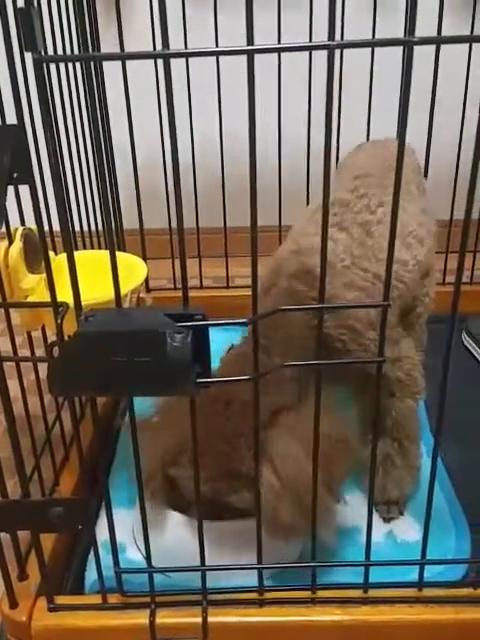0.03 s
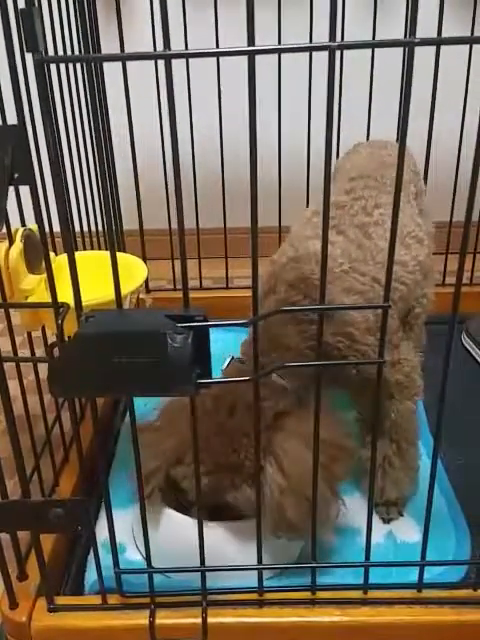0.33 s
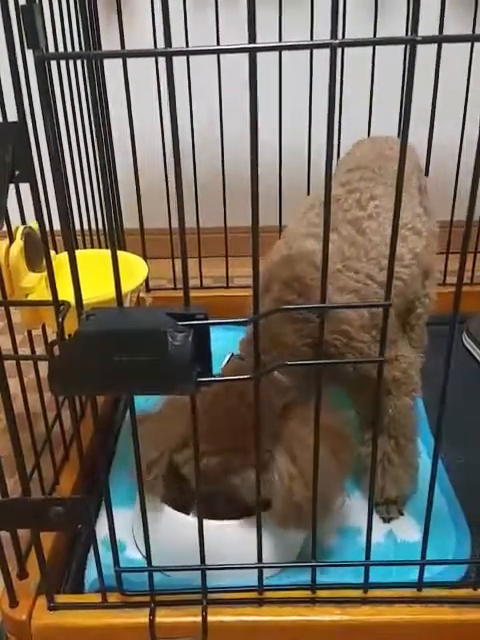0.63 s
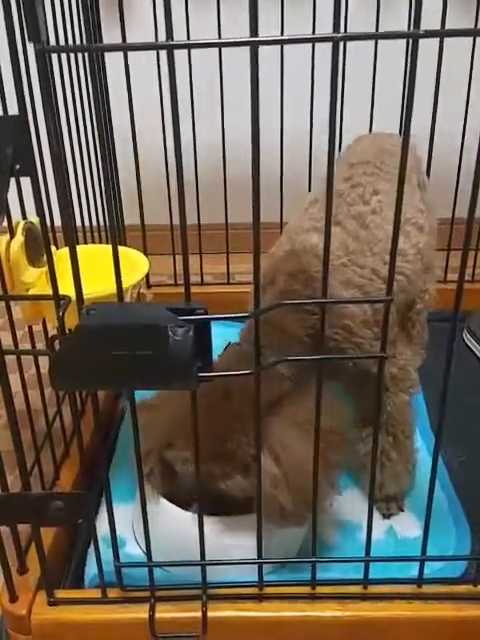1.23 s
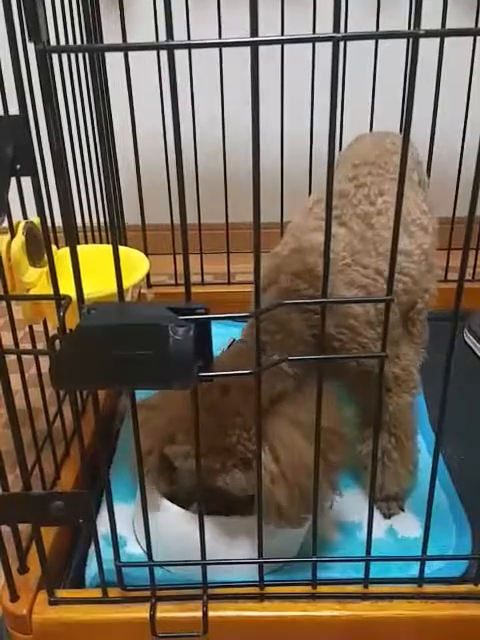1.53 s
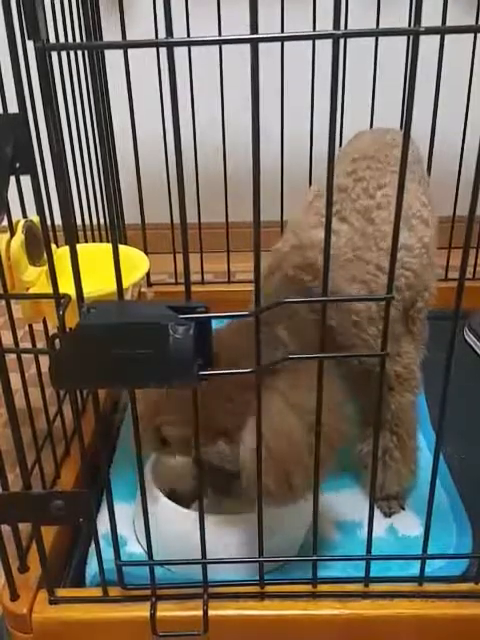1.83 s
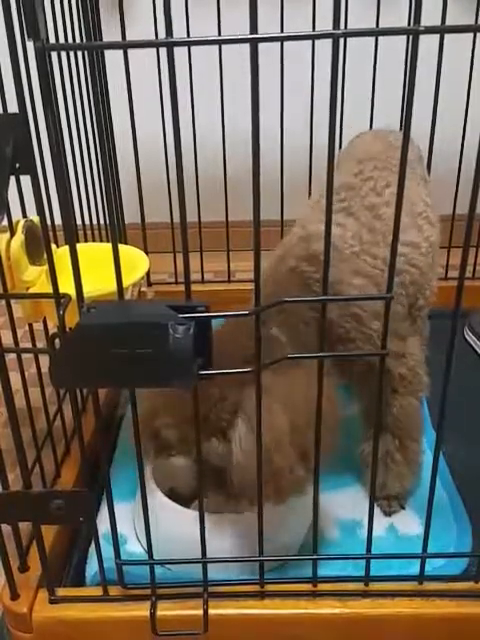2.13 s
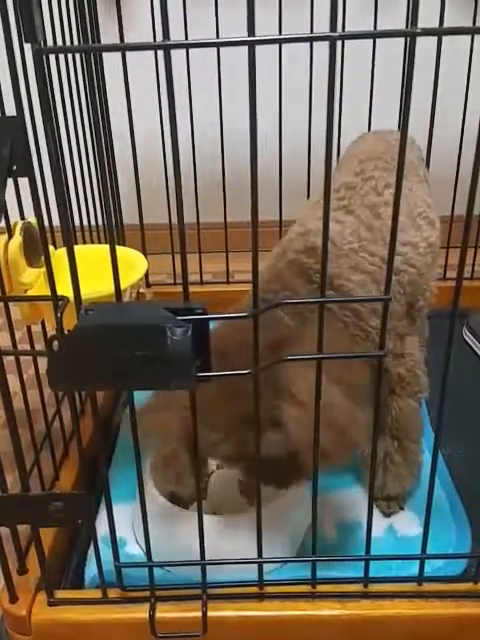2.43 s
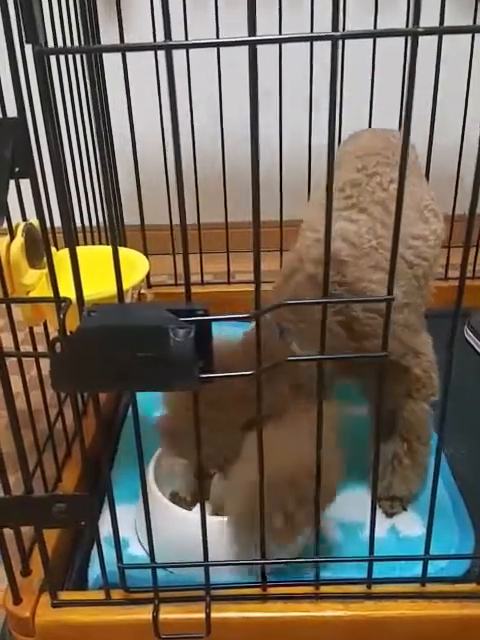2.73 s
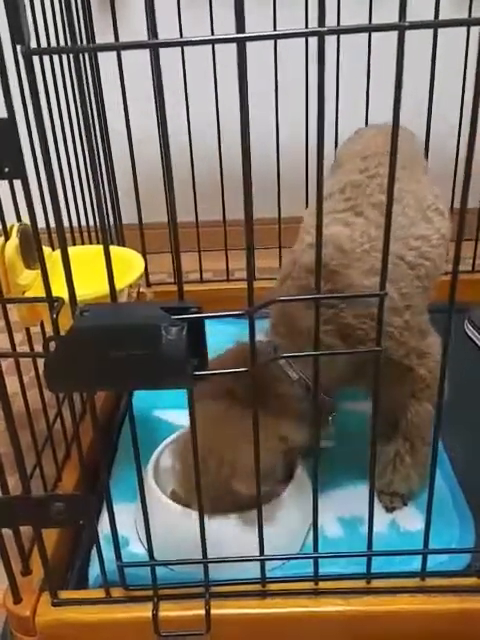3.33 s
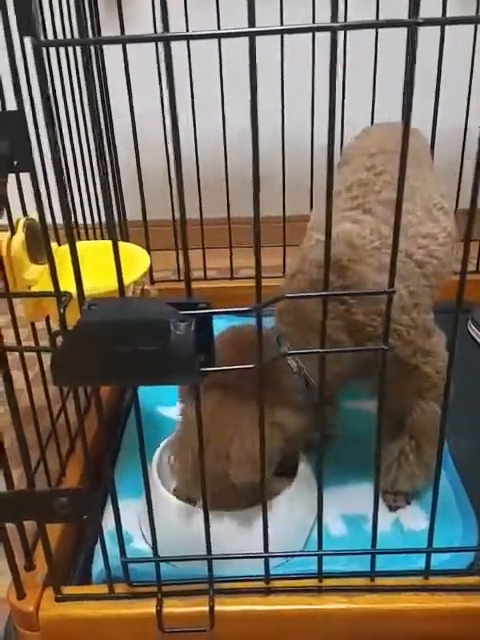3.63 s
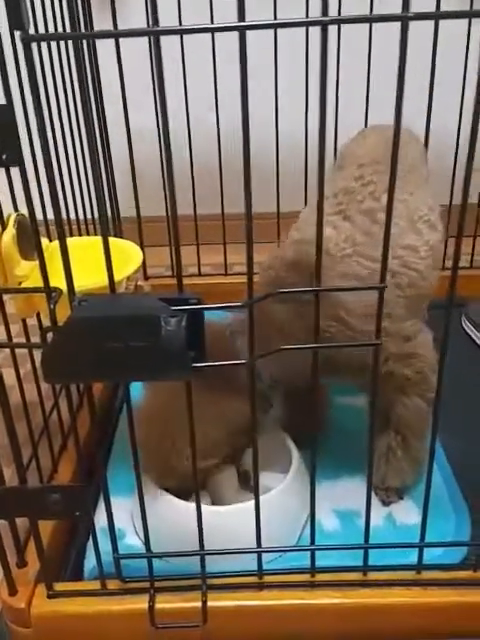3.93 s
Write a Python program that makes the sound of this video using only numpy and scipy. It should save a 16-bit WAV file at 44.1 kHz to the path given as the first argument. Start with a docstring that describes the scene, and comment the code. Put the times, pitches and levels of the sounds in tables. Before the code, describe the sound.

A small dog crunches dry food from a bowl, with a few dull microphone bumps.

```python
"""A quiet room, with a stereo microphone by a wire cage where a small dog chews dry food at a bowl.
Pellets crack and crumble, sounding the jaw and faintly ringing the bowl; teeth click, the tongue
ticks and the muzzle rubs through the food. Two runs of soft low knocks pass over the room's hush.
The right microphone port is muffled, so the crunching leans left, and handling bumps that port
with a few dull thuds."""
import sys
import numpy as np
from scipy import signal
from scipy.fft import rfft, irfft, next_fast_len
from scipy.io import wavfile
from scipy.ndimage import map_coordinates

SR = 44100
rng = np.random.default_rng(int(sys.argv[2]) if len(sys.argv) > 2 else 0)


def int16_out(signal):
    """Quantize to a 16-bit WAV file."""
    q = np.round(np.clip(np.atleast_2d(signal).T, -1, 1) * 32767)
    wavfile.write(sys.argv[1], SR, q.astype(np.int16))


N = 176400


def amp(db):
    return 10 ** (np.asarray(db) / 20)


def unit_rms(x):
    return x / np.sqrt(np.mean(x ** 2) + 1e-30)


def along(points, hz):
    """Read a curve of (Hz, value) points on a log frequency axis."""
    point_hz, values = np.transpose(points)
    return np.interp(np.log(hz + 1), np.log(point_hz + 1), values)


def add(track, start, sound):
    """Mix a sound in at a start time in seconds."""
    i = max(round(start * SR), 0)
    track[i:i + len(sound)] += sound[:max(N - i, 0)]


def coloured(x, points, keep_power=False):
    """Pass x through a minimum-phase filter with the given (Hz, dB) shape."""
    size = 2 * next_fast_len(N // 2 + SR // 8)
    gain = amp(along(points, np.fft.rfftfreq(size, 1 / SR)))
    cepstrum = irfft(np.log(unit_rms(gain) if keep_power else gain), size)
    cepstrum[1:size // 2] *= 2
    cepstrum[size // 2 + 1:] = 0
    return irfft(rfft(x, size) * np.exp(rfft(cepstrum)), size)[:N]


def evened(x):
    """Halve the spectral peaks and holes of x in dB, keeping its energy."""
    spectrum = rfft(x)
    even = irfft(spectrum / np.sqrt(np.abs(spectrum) + 1e-9), len(x))
    return even * np.linalg.norm(x) / np.linalg.norm(even)


def ring(t, hz, t60, rise_s=0.00087):
    """One damped mode with a quick rise."""
    return np.sin(2 * np.pi * hz * t) * amp(-60 * t / t60) * (1 - np.exp(-t / rise_s))


def burst(t, rise_s=0.00068, decay_s=0.00059):
    """A broadband crack that dies within a few milliseconds."""
    decay = np.exp(-t / decay_s)
    rise = 1 - np.exp(-t / rise_s)
    crack = evened(rise * decay * rng.standard_normal(len(t)))
    crack *= np.exp(-t / decay_s / 10)  # keeps the evened crack short
    return crack * np.linalg.norm(decay) / np.linalg.norm(crack)


# The room's reverberation. Each row: frequency in Hz, t60 in seconds.
ROOM_DECAY = [(200, 0.4), (2000, 0.37), (8000, 0.28), (15000, 0.17)]
def in_room(sound, wet_db):
    """A short sound reaches the microphone directly, then as its own diffuse room tail."""
    hz, t, noise = signal.stft(rng.standard_normal(SR // 3), SR, nperseg=256)
    decay = amp(-60 * t / along(ROOM_DECAY, hz)[:, None])
    tail = signal.istft(noise * decay, SR, nperseg=256)[1]
    tail = np.pad(tail, (SR // 500, 0))  # 2 ms behind the direct sound
    response = amp(wet_db) * tail / np.linalg.norm(tail)
    response[0] = 1
    return signal.fftconvolve(sound, response)


# Room tone at each port. Each row: frequency in Hz, relative level in dB.
LEFT_TONE = [(20, -10.5), (60, -8.5), (130, 0), (190, -5.5), (310, -2.5), (420, -10), (490, -4.5),
             (620, -13), (850, -11), (1600, -18.5), (3000, -26), (4400, -31.5), (6000, -36), (7000, -33.5),
             (7950, -20.5), (8700, -29.5), (10000, -29), (15500, -30.5)]
RIGHT_TONE = [(20, -15), (70, -5.5), (130, 1.5), (180, -6), (240, -2.5), (400, -9.5), (650, -13.5),
              (900, -15.5), (1250, -20.5), (3000, -25.5), (4400, -29.5), (6000, -34), (7800, -33.5),
              (9500, -34.5), (12500, -29.5), (15500, -32)]
# How alike the ports hear it. Each row: frequency in Hz, left-right correlation.
TONE_LIKENESS = [(60, 0.61), (150, 0.77), (380, 0.51), (950, 0), (2400, 0)]
def room_tone(left_db=-60.5, right_db=-62.5, waver_db=0.6, whine_hz=9082, whine_db=-79):
    """Steady hush, alike at both ports in the bass; the left wavers slightly and has a thin whine."""
    hz = np.fft.rfftfreq(N, 1 / SR)
    spread = np.arccos(np.clip(along(TONE_LIKENESS, hz), -1, 1)) / 2
    mid, side = rfft(rng.standard_normal((2, N))) * [np.cos(spread), np.sin(spread)]
    waver = amp(waver_db * map_coordinates(rng.standard_normal(40), [np.linspace(0, 39, N)]))
    left = amp(left_db) * unit_rms(irfft((mid + side) * amp(along(LEFT_TONE, hz)), N))
    right = amp(right_db) * unit_rms(irfft((mid - side) * amp(along(RIGHT_TONE, hz)), N))
    whine = amp(whine_db) * np.sin(2 * np.pi * whine_hz * np.arange(N) / SR)
    return np.array([left * waver + whine, right])


# Soft low knocks in the room. Each row: start in seconds, level in dB, pitch in Hz, t60 in seconds.
LOW_KNOCKS = [(0.53, -44, 400, 0.018), (0.5731, -42, 423, 0.038), (0.6201, -40, 364, 0.025),
              (0.6694, -41, 406, 0.026), (0.706, -40, 298, 0.0099), (0.7576, -37.5, 400, 0.021),
              (0.790, -43, 386, 0.023), (.822, -46, 410, .02), (0.88, -48, 237, 0.021),
              (0.95, -48.5, 365, 0.029), (1.080, -55, 364, 0.093), (1.162, -52, 248, .02),
              (1.435, -44, 330, 0.024), (1.478, -47, 282, 0.032), (1.498, -44.5, 335, 0.026),
              (1.521, -46, 270, 0.05), (1.544, -49.5, 280, 0.052)]
# The scuff on each knock. Each row: frequency in Hz, relative gain in dB.
KNOCK_SCUFF_COLOUR = [(60, -17), (120, -5), (250, 1.5), (500, 2), (700, -11), (1100, -28), (3000, -66)]
def knocks(scuff_db=-14, scuff_s=0.0071):
    """Each knock is a short mode and a weaker overtone over a lower thud, blurred by a dull scuff."""
    tones, scuffs = np.zeros((2, N))
    t = np.arange(SR // 8) / SR
    for start, db, hz, t60 in LOW_KNOCKS:
        thud = amp(-7) * ring(t, hz=180, t60=0.027)
        overtone = amp(-11) * ring(t, 1.27 * hz, t60=0.018)
        add(tones, start, amp(db) * in_room(ring(t, hz, t60) + thud + overtone, wet_db=-7))
        add(scuffs, start, amp(db + scuff_db) * np.exp(-t / scuff_s) * rng.standard_normal(len(t)))
    return tones + coloured(scuffs, KNOCK_SCUFF_COLOUR, keep_power=True)


# Handling, right on the microphone. Each row: centre in seconds, level in dB, pitch in Hz,
# treble fall in dB per octave, scuff and casing level in dB relative to the push.
PORT_BUMPS = [(1.005, -44, 110, 27, -33), (1.633, -55, 60, 30, -25), (1.8146, -38.5, 92, 35, -18),
              (2.471, -26, 95, 19, -40), (3.0942, -16, 151, 27, -20.5), (3.1003, -14.5, 104.5, 21.5, -12.5),
              (3.116, -34.5, 81, 19, -15), (3.5058, -12.5, 138, 13.5, -29), (3.523, -22.5, 105, 20.5, -22)]
# A push on the port, and its scuff. Each row: frequency in Hz, relative gain in dB.
PUSH_COLOUR = [(30, 1), (60, 0), (100, 0.5), (175, 1.5), (255, 2), (350, -1), (480, -3.5), (850, -4.5),
               (1500, -5.5)]
BUMP_SCUFF_COLOUR = [(30, 9.5), (120, 3), (230, -3), (380, 3.5), (560, -7.5), (850, -11.5), (1100, -16.5),
                     (1400, -26.5), (2000, -38), (4000, -67)]
def handling_bumps(bass_db_per_octave=9, top_hz=1400, scuff_s=0.0057):
    """Each push on the port swells and dies, with a brief dull scuff and a dead knock of the casing."""
    pushes, scuffs, casing = np.zeros((3, N))
    size = 8192
    hz = np.fft.rfftfreq(size, 1 / SR)
    t = (np.arange(size) - size / 2) / SR
    for centre, db, pitch_hz, fall_db, scuff_db in PORT_BUMPS:
        octaves = np.log2((hz + 1) / pitch_hz)
        band = 1 / np.hypot(amp(-bass_db_per_octave * octaves), amp(fall_db * octaves))
        push = np.fft.fftshift(irfft(band * np.exp(-(hz / top_hz) ** 2 / 2)))
        scuff = evened(np.exp(-(t / scuff_s) ** 2) * rng.standard_normal(size))
        add(pushes, centre + t[0], amp(db) * push / push.max())
        add(scuffs, centre + t[0], amp(db + scuff_db) * scuff)
        add(casing, centre, amp(db + scuff_db) * ring(t - t[0], hz=399, t60=0.016))
    return coloured(pushes, PUSH_COLOUR) + coloured(scuffs, BUMP_SCUFF_COLOUR, keep_power=True) + casing


# The muzzle down in the bowl. Each row: centre in seconds, level in dB, half-width in seconds.
MUZZLE_RUBS = [(1.515, -60, 0.045), (1.825, -65.5, 0.031), (2.272, -61, 0.03), (2.517, -72, .04),
               (2.658, -61, 0.022), (3.083, -65.5, 0.2), (3.345, -76, 0.038)]
# The rustle of the food. Each row: frequency in Hz, relative gain in dB.
RUB_COLOUR = [(150, -0.5), (300, -1.5), (850, 4.5), (1400, 0), (2200, -8), (3300, -16), (4300, -12.5),
              (5800, -23), (7900, -10), (10000, -21), (15000, -31)]
def muzzle_rubs():
    """The muzzle rubs through the food: grainy noise that swells and fades with the pressure."""
    t = np.arange(N) / SR
    pressure = sum(amp(db) * np.exp(-2 * ((t - centre) / width) ** 2) for centre, db, width in MUZZLE_RUBS)
    return coloured(pressure * unit_rms(rng.laplace(size=N)), RUB_COLOUR, keep_power=True)


# The tongue, among the bites. Each row: start in seconds, level in dB.
TONGUE_TICKS = [(.822, -54), (1.029, -56), (3.389, -55), (3.68, -56), (3.862, -59), (3.938, -56),
                (3.942, -54.5)]
# Its thin treble. Each row: frequency in Hz, relative gain in dB.
TICK_COLOUR = [(5000, -37), (9000, -1), (12500, -4), (16000, -10)]
def tongue_ticks():
    """The wet tongue makes tiny bright bursts."""
    ticks, t = np.zeros(N), np.arange(SR // 12) / SR
    for start, db in TONGUE_TICKS:
        add(ticks, start, amp(db) * in_room(burst(t), wet_db=-9.5))
    return coloured(ticks, TICK_COLOUR, keep_power=True)


# Teeth meeting. Each row: start in seconds, level in dB, mouth pitch in Hz, relative tap level in dB.
TOOTH_CLICKS = [(0.0285, -44.5, 2000, -1), (0.378, -45, 1680, 11), (.72, -56, 2040, -6),
                (1.094, -56, 2050, -16), (1.162, -43, 1620, 6), (1.4937, -50.5, 2050, -4.5),
                (1.7986, -46, 1920, -3.5), (1.962, -53.5, 1890, -6), (1.969, -52, 1900, -3),
                (2.132, -50.5, 1930, -4), (2.199, -58, 1880, -8), (2.299, -53.5, 1770, 0),
                (2.647, -56, 1190, 10), (3.329, -52.5, 1730, -5)]
def tooth_clicks(roughness=0.041):
    """Teeth meet with a dull tap and ring the mouth briefly."""
    clicks, t = np.zeros(N), np.arange(SR // 16) / SR
    for start, db, hz, tap_db in TOOTH_CLICKS:
        contact = roughness * burst(t)
        contact[0] = 1  # the clean impact ahead of the rough contact
        mouth = ring(t, hz, t60=0.017, rise_s=0.00039)
        tap = amp(tap_db) * ring(t, hz=1120, t60=0.0038, rise_s=1 / SR)
        click = signal.fftconvolve(contact, mouth + tap)[:len(t)]
        add(clicks, start, amp(db) * in_room(click / np.abs(click).max(), wet_db=-9.5))
    return clicks


# The bowl under the pellets. Each row: frequency in Hz, relative level in dB, t60 in seconds.
BOWL_MODES = [(1660, 8.5, 0.2), (2050, 7, 0.085), (2286, 14.5, 0.097), (2850, 0.5, 0.17), (7100, 3, 0.14),
              (7700, 11, 0.11), (7740, 14, 0.11), (7989, 9, 0.13), (8500, 2, 0.12), (8900, -3, .15)]
def bowl_ring(jaw_db, low_hz=4000, scatter_db=6.8):
    """One crack rings the bowl's modes unevenly; the low ones follow the jaw's strength."""
    t = np.arange(SR // 5) / SR
    modes = np.zeros(len(t))
    for hz, db, t60 in BOWL_MODES:
        strength = amp(db + jaw_db * (hz < low_hz) + rng.normal(0, scatter_db))
        modes += strength * ring(t, hz, t60, rise_s=0.00059)
    return modes


def crumbs(t, per_s=900, scatter_db=9, rise_s=0.0024, decay_s=0.014):
    """A breaking pellet sheds a brief shower of tiny impulses of uneven size."""
    sizes = amp(scatter_db * np.clip(rng.standard_normal(len(t)), -2, 1))
    signs = np.sign(rng.standard_normal(len(t)))
    hits = rng.random(len(t)) < per_s / SR
    return hits * sizes * signs * np.exp(-t / decay_s) * (1 - np.exp(-t / rise_s))


# Pellets breaking at the bowl, clearest at the left port. Each row: start in seconds, level in dB,
# relative jaw resonance in dB, relative crumb level in dB.
PELLET_CRACKS = [(.028, -50.5, 2, -22), (.0315, -54.5, -3, -12), (.089, -54.5, 3.5, 3.5),
                 (0.326, -53, 2, -15), (0.3464, -43, -11, -10), (0.3553, -49, -7, -7), (.369, -54.5, 4, 3),
                 (.472, -52, -5, -12), (0.488, -47, -2, 3), (.503, -51, -5, -2), (.575, -54.5, 0, -2),
                 (0.5895, -44.5, -10, -20), (0.5962, -42.5, -6, -10), (.616, -47.5, -4.5, 1),
                 (0.624, -56, 2, -1), (.851, -60, 8.5, -19), (.874, -41.5, -7, -3), (0.8804, -42, 1, -10),
                 (0.8894, -42, -4, -10), (1.051, -64, 1.5, 12), (1.089, -53, -1.5, -13),
                 (1.0922, -49.5, 2, -4), (1.097, -48, -3, -11), (1.433, -59, -4, -7),
                 (1.494, -49, -10, -19), (1.546, -62, -9, -5), (1.598, -59.5, -1, -2),
                 (1.798, -58, -10, -10), (1.902, -63, 4, 3.5), (2.134, -63.5, 5, 2), (2.179, -55, -5, -13),
                 (2.252, -59.5, -5, 8.5), (2.492, -64.5, -4, 9.5), (3.278, -60.5, 2.5, 3),
                 (3.353, -51, -4.5, -6), (3.362, -54, -9, -4), (3.374, -51.5, -6, -10),
                 (3.389, -54, -8, -21), (3.442, -60.5, 2, -12), (3.589, -56.5, -0.5, -12),
                 (3.708, -59.5, 0, -3), (3.752, -53, -4, -3), (3.764, -54, -7, -8), (3.772, -45, -6, -14)]
# The bright snap and the jaw's resonance. Each row: frequency in Hz, relative gain in dB.
SNAP_COLOUR = [(2500, -47), (5800, -35.5), (6400, -22), (6900, -11), (7400, -8), (7950, -1.5), (8450, -4.5),
               (8800, -7.5), (10000, -13), (12000, -17), (15500, -27.5)]
JAW_COLOUR = [(150, -12.5), (700, -9), (1350, -17), (1640, 1), (1850, -2.5), (2100, 0.5), (2450, -7),
              (2850, -5), (3350, -17), (4100, -8), (5600, -21.5), (9000, -66)]
def crunching(snap_gain_db=5, jaw_gain_db=1.5, bowl_gain_db=-31.5):
    """Each pellet cracks and crumbles, snapping brightly, sounding the jaw and ringing the bowl."""
    snap, jaw, bowl = np.zeros((3, N))
    t = np.arange(SR // 12) / SR
    for start, db, jaw_db, crumbs_db in PELLET_CRACKS:
        for track, gain_db in ((snap, snap_gain_db), (jaw, jaw_gain_db + jaw_db)):
            fracture = amp(crumbs_db) * crumbs(t) + burst(t)
            add(track, start, amp(db + gain_db) * in_room(fracture, wet_db=-2))
        add(bowl, start, amp(db + bowl_gain_db) * bowl_ring(jaw_db))
    snap = coloured(snap, SNAP_COLOUR, keep_power=True)
    jaw = coloured(jaw, JAW_COLOUR, keep_power=True)
    return snap + jaw + bowl


# The muffled right port of the microphone. Each row: frequency in Hz, gain in dB.
RIGHT_MUFFLE = [(100, -0.5), (400, -0.5), (700, -6), (1600, -16), (4000, -22), (8000, -38), (15000, -25)]
def scene():
    """The left port hears the dog clearly; the right one is muffled and takes the bumps."""
    clear = crunching() + tongue_ticks() + tooth_clicks() + muzzle_rubs() + knocks()
    muffled = coloured(clear, RIGHT_MUFFLE) + handling_bumps()
    return np.array([clear, muffled]) + room_tone()


def record(dry, top_hz=15830):
    """Nothing is kept above the band limit."""
    size = next_fast_len(N + SR // 4)
    passband = np.fft.rfftfreq(size, 1 / SR) < top_hz
    return irfft(rfft(dry, size) * passband, size)[:, :N]


dry = scene()
out = record(dry)
int16_out(out)
```